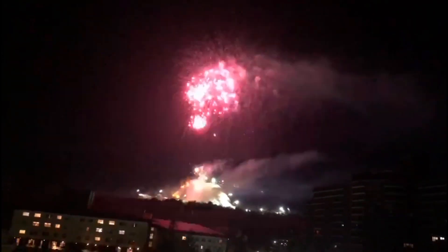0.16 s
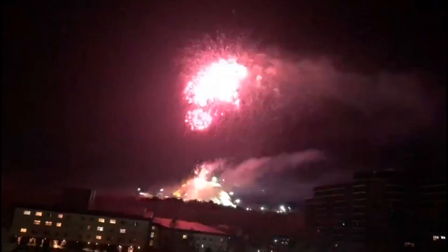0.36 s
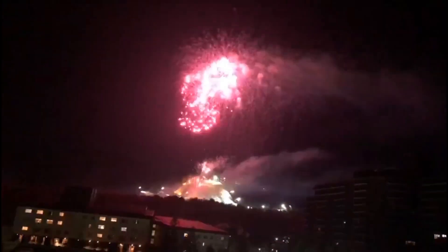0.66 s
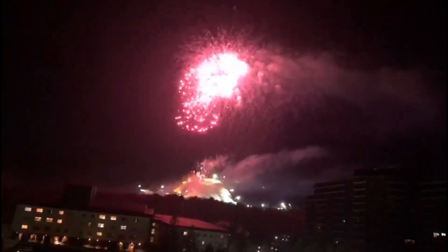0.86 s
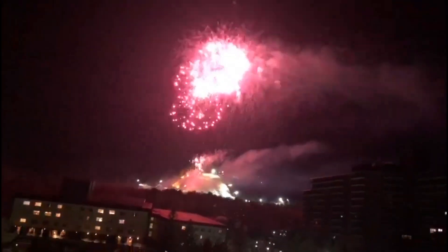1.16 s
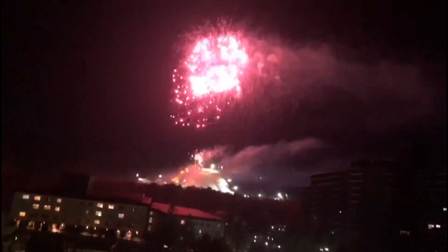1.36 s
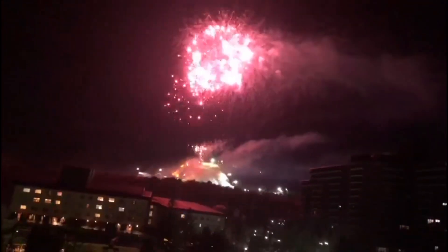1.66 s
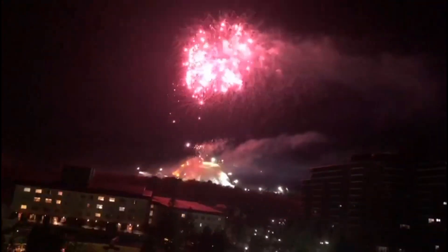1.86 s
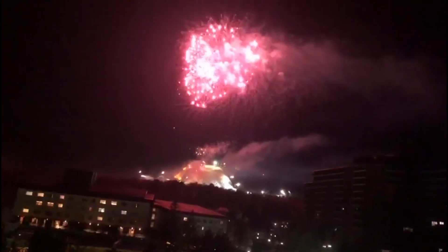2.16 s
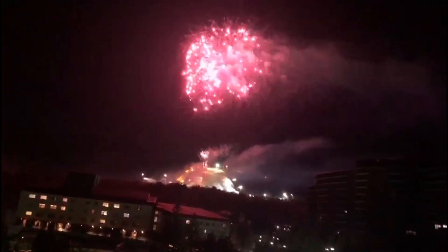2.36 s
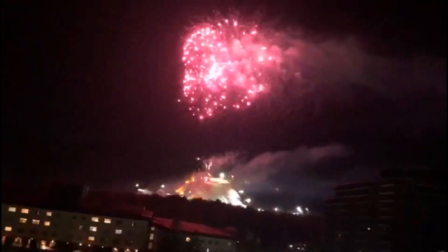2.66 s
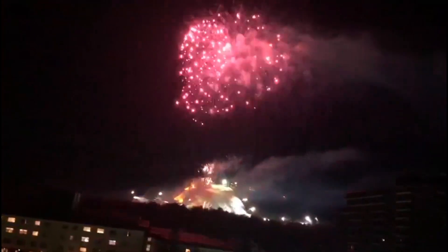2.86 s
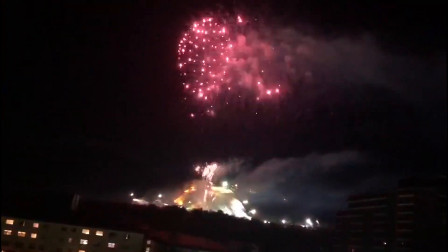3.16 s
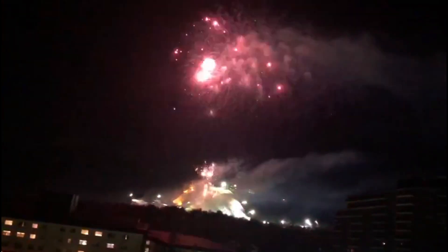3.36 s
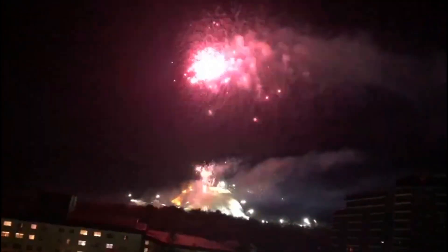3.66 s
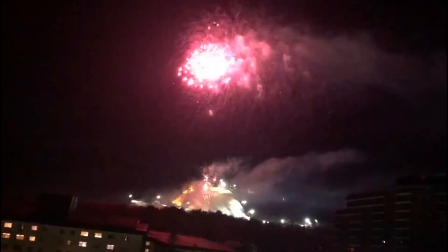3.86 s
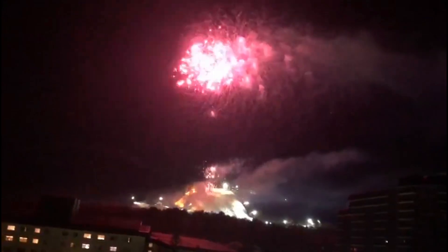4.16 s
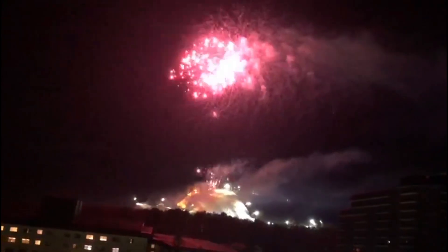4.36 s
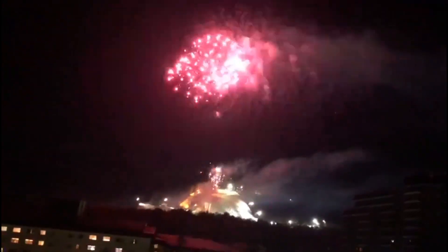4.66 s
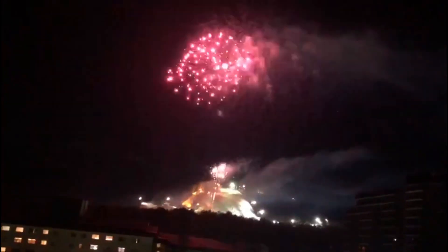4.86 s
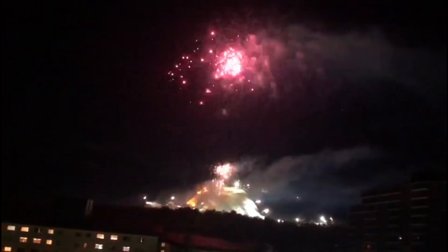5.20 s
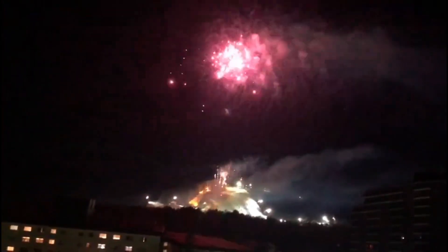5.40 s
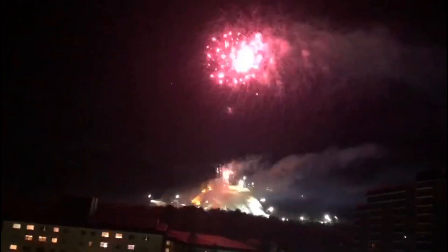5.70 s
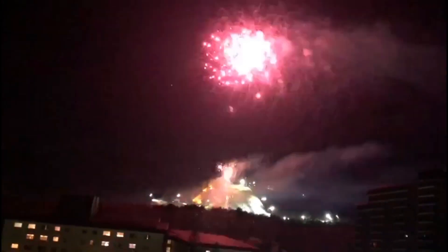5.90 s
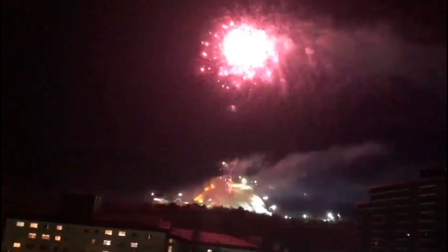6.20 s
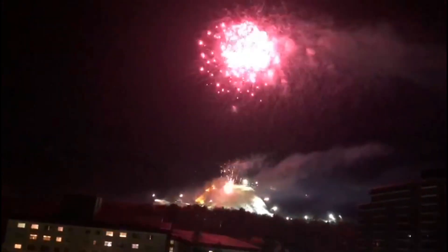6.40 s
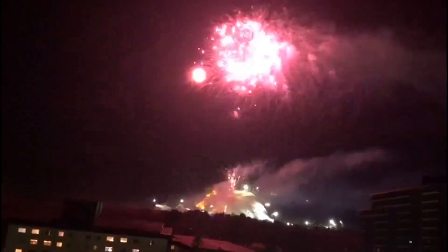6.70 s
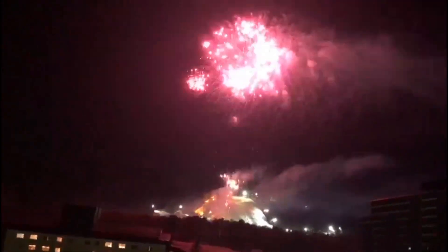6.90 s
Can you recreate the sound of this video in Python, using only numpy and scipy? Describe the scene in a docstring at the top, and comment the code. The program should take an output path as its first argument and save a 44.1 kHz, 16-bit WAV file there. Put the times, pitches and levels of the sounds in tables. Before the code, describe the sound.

Outdoors at night among apartment blocks, firework shells explode over a distant hill. Each begins with a hard, bass-heavy crack, followed instantly by slaps off nearby walls, then a hollow house echo and a fading roll over the town. Duller mortar thumps fall between. A low, dark town rumble continues underneath; a small single-channel microphone squashes the loudest peaks.

```python
"""Firework shells burst over a distant hill, heard at night from among apartment blocks.
First comes the town's low rumble (coloured noise) under the dying roll of an earlier shell.
Then each blast reaches the microphone as a sharp filtered pulse, slaps between nearby walls as
delayed pulses and rolls away over the town as fading noise; mortars soon thump on the hill as
low pulses with noise echoes. The small recorder delays the bass and limits the loudest peaks."""
import sys
import numpy as np
from scipy import signal
from scipy.fft import rfft, irfft, next_fast_len
from scipy.io import wavfile
from scipy.ndimage import uniform_filter1d, minimum_filter1d

SR = 44100
rng = np.random.default_rng(int(sys.argv[2]) if len(sys.argv) > 2 else 0)


def unload_wav(signal):
    """Save mono or channel-first audio to the path in sys.argv[1] as 16-bit WAV at rate SR, clipped to [-1, 1]."""
    wavfile.write(
        sys.argv[1],
        SR,
        np.round(np.clip(np.atleast_2d(signal).T, -1, 1) * 32767).astype(np.int16),
    )


N = 310464  # length in samples
SIZE = 2 ** 17  # samples in one blast or thump with its echoes
HZ, AGE = np.fft.rfftfreq(SIZE, 1 / SR), np.arange(SIZE) / SR  # AGE: seconds since the blast


def amp(db):
    """Decibels to gain."""
    return 10 ** (np.asarray(db) / 20)


def unit(x):
    """Scale to rms 1."""
    return x / np.sqrt(np.mean(x ** 2) + 1e-20)


def along(points, hz):
    """Read a (freq_hz, level_db) curve at the frequencies hz, on a log axis."""
    freq_hz, level_db = np.transpose(points)
    return np.interp(np.log(hz + 1), np.log(freq_hz + 1), level_db)


def wobble(rate, size):
    """A smooth random curve with rate knots a second."""
    knots = rng.standard_normal(int(size * rate / SR) + 4)
    smooth = signal.resample_poly(knots, 10, 1)
    return np.interp(np.arange(size) * rate * 10 / SR, np.arange(len(smooth)), smooth)


def noise(spectrum, size):
    """Coloured noise of rms 1: white noise shaped by a (freq_hz, level_db) curve."""
    white = rfft(rng.standard_normal(size))
    gains = amp(along(spectrum, np.fft.rfftfreq(size, 1 / SR)))
    return unit(irfft(white * gains, size))


def causal(db):
    """The minimum-phase response with these gains: its energy comes as early as it can."""
    cepstrum = irfft(np.log(amp(db)))
    # fold the second half onto the first, so nothing sounds before time zero
    cepstrum[1:SIZE // 2] *= 2
    cepstrum[SIZE // 2 + 1:] = 0
    return np.exp(rfft(cepstrum))


def add(track, s, sound):
    """Mix a sound in from time s, in seconds."""
    start = max(0, round(s * SR))
    part = sound[:max(0, N - start)]
    track[start:start + len(part)] += part


# colour of the town's rumble at the microphone: freq_hz, level_db (per Hz)
NIGHT_SPECTRUM = [(25, -33), (60, -14), (100, -7), (150, -6), (215, 0), (270, -3), (345, 0), (420, -6.5),
                  (520, -2.5), (750, -13.5), (1000, -15), (1600, -24.5), (2400, -42), (4000, -57.5),
                  (7000, -91)]
NIGHT_DB = -38.7
EARLIER_DB, EARLIER_FADE_DB_PER_S = -37.5, 16


def night():
    """The town's rumble and the last echoes of an earlier shell: one noise, powers added."""
    earlier = amp(EARLIER_DB - EARLIER_FADE_DB_PER_S * np.arange(N) / SR)
    level = np.hypot(amp(NIGHT_DB), earlier)
    waver = amp(0.47 * wobble(14, N))
    return noise(NIGHT_SPECTRUM, N) * level * waver


# colour of the microphone's own noise: freq_hz, level_db (per Hz)
HISS_SPECTRUM = [(100, 0), (3000, -1), (6000, -1), (9000, -3.5), (10800, -4), (12000, -21)]


def hiss():
    """The microphone's own faint, constant noise."""
    return amp(-78.5) * noise(HISS_SPECTRUM, N)


def scatter(spectrum, strength, clump_db, air_db):
    """Countless small reflections in clumps; the air takes air_db a second from the treble."""
    echo = noise(spectrum, SIZE)
    dull = irfft(rfft(echo) / (1 + (HZ / 3000) ** 4))
    treble = (echo - dull) * amp(-air_db * AGE)  # later echoes have come a longer way
    clumps = amp(clump_db * wobble(70, SIZE))
    return (dull + treble) * strength * clumps


def swell(*areas):
    """Echo strength against age: each area builds up, holds and fades at a steady dB rate."""
    power = np.zeros(SIZE)
    for first_s, build_s, hold_s, level_db, fade_db_per_s in areas:
        rise = np.clip((AGE - first_s) / build_s, 0, 1)
        fading_s = np.maximum(0, AGE - first_s - build_s - hold_s)
        power += (rise * amp(level_db - fade_db_per_s * fading_s)) ** 2
    return np.sqrt(power)


# nearby walls answer one after another, about evenly spaced; those beyond the courtyard are fainter
WALL_COUNT = 16  # besides the nearest
FIRST_WALL_S, FIRST_WALL_DB = .008, 1.5
WALL_GAP_S, WALL_SCATTER_S, WALL_DB, WALL_SPREAD_DB = .0044, .0012, -3.8, 2
COURTYARD_S, WALL_FADE_DB_PER_S = .06, 190


def walls():
    """Slaps off nearby walls: the nearest is fixed, the others get random delays and levels per shell."""
    late, loud = rng.standard_normal((2, WALL_COUNT))
    gaps = np.abs(WALL_GAP_S + WALL_SCATTER_S * late)
    delays = FIRST_WALL_S + np.cumsum(gaps)
    beyond = np.maximum(0, delays - COURTYARD_S)
    levels = WALL_DB + WALL_SPREAD_DB * loud - WALL_FADE_DB_PER_S * beyond
    places = np.round(np.append(FIRST_WALL_S, delays) * SR).astype(int)
    gains = amp(np.append(FIRST_WALL_DB, levels))
    return rfft(np.bincount(places, gains, SIZE))


def ledges(share, longest, count):
    """A few very short detours comb the echoes, giving each shell its own hollow colour."""
    delays = rng.uniform(0.001044, longest, (count, 1))  # seconds
    comb = 1 + share * np.exp(-2j * np.pi * HZ * delays).sum(0)
    return comb / np.sqrt(1 + count * share ** 2)


# narrow tones that ring on in the roll over the town: pitch_hz, width_hz, level_db
RING_TONES = [(122, 20, -4.5), (328, 14, -2.5)]


def ringing():
    """Resonances added to the plain response let the narrow tones ring on."""
    response = 1
    for pitch_hz, width_hz, level_db in RING_TONES:
        damping = 1j * HZ * width_hz
        response = response + amp(level_db) * damping / (pitch_hz ** 2 - HZ ** 2 + damping)
    return response


# shell bursts over the hill: start_s, level_db, bass_db, treble_db, roll_db (over the town),
# front_db (house fronts), side_db (side-wall echo), tower_s (tower delay), tower_db (tower echo)
SHELL_BURSTS = [(0.3631, 0.5, -0.5, 4, -0.5, -3, -9.5, .054, -7.5),
                (1.4316, 1, -0.5, 2.5, 0.5, -1, -14, .055, -18),
                (1.487, -1, 2.5, -2, -3.5, -1, -20, .052, -8),
                (1.8711, 1.5, 8, 13.5, 0.5, 2.5, -17, .052, -11),
                (2.6884, -1.5, 2.5, -2, -3.5, 0, -15, .048, -9),
                (3.0745, 0.5, 1, 1.5, 0.5, -2.5, -15, .0545, -8),
                (4.7507, -1.5, 3, 0.5, 0.5, 1, -22, .055, -16), (4.775, -0.5, 2, 2, -2, 0, -15, .053, -8),
                (6.3333, 0.5, 0.5, 0, 1.5, -1, -15, .0577, -9),
                (6.8381, 0, 0, 1.5, -2.5, 4, -24, .0545, -12)]
# pulse of the direct crack: freq_hz, level_db
BLAST_PULSE = [(25, 13.5), (70, 20.5), (140, 27), (200, 31), (320, 37), (550, 31), (1000, 27.5), (2000, 16),
               (3500, 1.5), (5000, -12), (8000, -38), (12000, -61)]
# duller pulse off each nearby wall: freq_hz, level_db
SLAP_PULSE = [(25, -7.5), (60, 20), (120, 26), (210, 26.5), (330, 23.5), (550, 16), (1000, 4), (2000, -21),
              (5000, -30.5), (12000, -63.5)]
# colour of the roll over the town: freq_hz, level_db (per Hz)
TOWN_SPECTRUM = [(25, -44.5), (60, -10), (120, -9), (215, 1.5), (275, -5), (350, -1.5), (540, -7),
                 (750, -15), (1000, -15.5), (2000, -29.5), (3500, -45), (6000, -69.5), (12000, -88)]
# colour of the echoes off house fronts: freq_hz, level_db (per Hz)
FACADE_SPECTRUM = [(60, -23.5), (200, -3.5), (450, 4.5), (750, -0.5), (1000, 0), (2000, -12.5),
                   (3500, -27.5), (6000, -50), (12000, -77.5)]
# areas that scatter a burst: first_s, build_s, hold_s, level_db, fade_db_per_s
NEAR_STREETS = (0, .02, .06, -22, 35)
FAR_STREETS = (.3, .4, .7, -45, 14)
COURTYARD = (0, .008, .046, -27.5, 520)
OPPOSITE_ROW = (.142, .01, .018, -29.6, 180)  # about 49 m of extra path
OTHER_HOUSES = (0, .06, .29, -41.3, 58)


def bursts():
    """Each shell: a direct crack, duller wall slaps, house echoes and the roll over the town."""
    out = np.zeros(N)
    crack, slap = causal(along(BLAST_PULSE, HZ)), causal(along(SLAP_PULSE, HZ))
    low = 1 / (1 + (HZ / 240) ** 4)
    high = HZ ** 2 / (HZ ** 2 + 4000 ** 2)
    rings = ringing()
    for start_s, level_db, bass_db, treble_db, roll_db, front_db, *_ in SHELL_BURSTS:
        streets = swell(NEAR_STREETS, FAR_STREETS)
        roll = amp(roll_db) * scatter(TOWN_SPECTRUM, streets, clump_db=1.3, air_db=13.5)
        houses = np.hypot(swell(COURTYARD), amp(front_db) * swell(OPPOSITE_ROW, OTHER_HOUSES))
        fronts = scatter(FACADE_SPECTRUM, houses, clump_db=2.3, air_db=15)
        colour = ledges(share=.25, longest=.005, count=3)
        echoes = slap * walls() + rings * rfft(roll) + colour * rfft(fronts)
        charge = causal(level_db + bass_db * low + treble_db * high)  # a big charge booms deeper
        edge = causal(treble_db * high)  # the steep front survives best on the direct path
        add(out, start_s, irfft(charge * (edge * crack + echoes)))
    return out


SIDE_WALL_S = .0336  # about 11.5 m of extra path
# what the side wall and tower do to the crack: freq_hz, level_db
REBOUND_TONE = [(400, 2.5), (1500, -9), (6000, -10)]


def rebounds():
    """A side wall and a tower block each return the whole crack, a little duller."""
    out = np.zeros(N)
    echo = irfft(causal(along(BLAST_PULSE, HZ) + along(REBOUND_TONE, HZ)))
    for start_s, *_, side_db, tower_s, tower_db in SHELL_BURSTS:
        add(out, start_s + SIDE_WALL_S, amp(side_db) * echo)
        add(out, start_s + tower_s, amp(tower_db) * echo)
    return out


# mortar launches on the hill: start_s, level_db, bright_db
MORTAR_LAUNCHES = [(1.3815, -0.5, -2.5), (2.205, -4, -1), (3.047, -1, 2.5), (3.379, -3, -2),
                   (3.9749, -1, 2), (5.7353, -0.5, -3.5)]
# pulse of a launch, and colour of its hillside echoes: freq_hz, level_db
THUMP_PULSE = [(25, -0.5), (50, 25.5), (80, 30.5), (125, 30), (200, 15.5), (350, 16), (1000, 4),
               (3000, -26.5), (6000, -53.5), (12000, -71.5)]
# areas that scatter a launch: first_s, build_s, hold_s, level_db, fade_db_per_s
HILL_FACE = (.03, .04, .01, -32.5, 95)
HILL_RIDGES = (0, .2, .45, -46.5, 25)
HOUSES_BELOW = (0, .008, .02, -41, 33)


def launches():
    """Mortars give a low thump; the hillside and, more brightly, the houses below it answer."""
    out = np.zeros(N)
    high = HZ ** 2 / (HZ ** 2 + 400 ** 2)
    for start_s, level_db, bright_db in MORTAR_LAUNCHES:
        thump = irfft(causal(along(THUMP_PULSE, HZ) + bright_db * high))
        hillside = scatter(THUMP_PULSE, swell(HILL_FACE, HILL_RIDGES), clump_db=2, air_db=11)
        houses = scatter(FACADE_SPECTRUM, swell(HOUSES_BELOW), clump_db=1.0, air_db=30)
        fronts = amp(bright_db / 2) * houses
        add(out, start_s, amp(level_db) * (thump + hillside + fronts))
    return out


def scene():
    """Everything that reaches the microphone, and its own faint hiss, as one channel."""
    mix = night() + hiss() + bursts() + rebounds() + launches()
    return mix[None]


def filtered(x, response):
    """x times a complex response of frequency; mirrored margins keep the ends smooth."""
    margin = SR // 2
    size = next_fast_len(N + 2 * margin)
    wide = np.pad(x, [(0, 0), (margin, margin)], "reflect", reflect_type="odd")
    shaped = irfft(rfft(wide, size) * response(np.fft.rfftfreq(size, 1 / SR)), size)
    return shaped[:, margin:margin + N]


def disperse(hz):
    """The recorder's filters delay the bass, so each crack becomes a quick falling chirp."""
    return np.exp(-2j * np.pi * (1.37 * np.log(1 + hz / 22) - .00048 * hz))


def limit(x, top, size):
    """A fast limiter that looks ahead and eases its gain down; size is in samples."""
    needed = minimum_filter1d(np.minimum(1, top / (np.abs(x) + 1e-9)), 2 * size + 1)
    gain = uniform_filter1d(uniform_filter1d(needed, size), size)
    return x * gain


TOP_HZ = 11800  # the recorder keeps nothing above this


def record(dry):
    """The recorder: bass delay, limiter, then band limit."""
    held = limit(filtered(dry, disperse), top=.92, size=45)
    return filtered(held, lambda hz: hz < TOP_HZ)


dry = scene()
out = record(dry)
unload_wav(out)
```